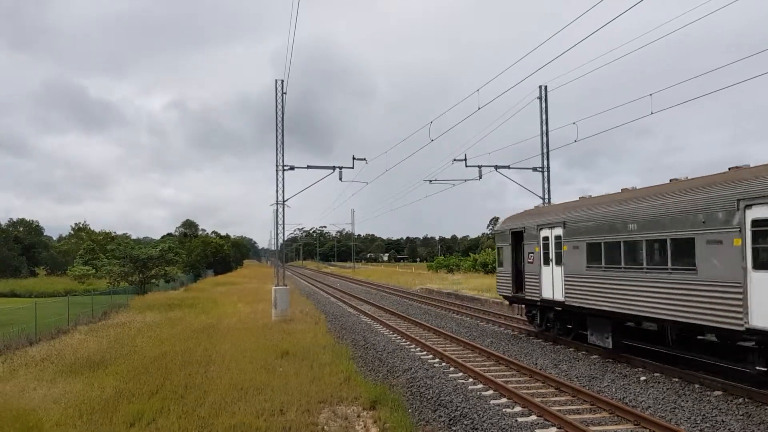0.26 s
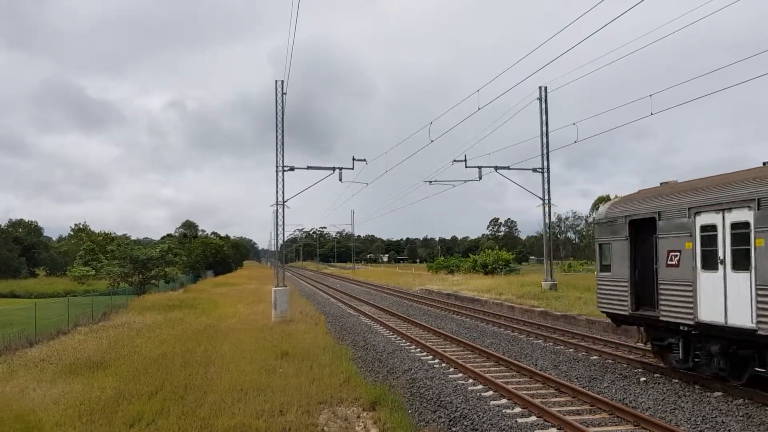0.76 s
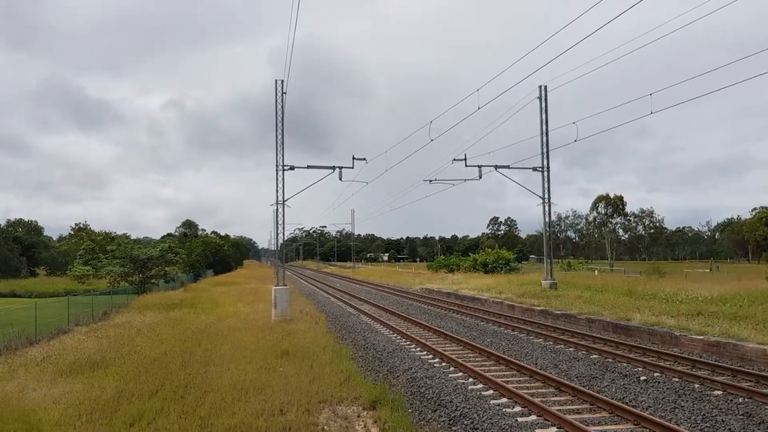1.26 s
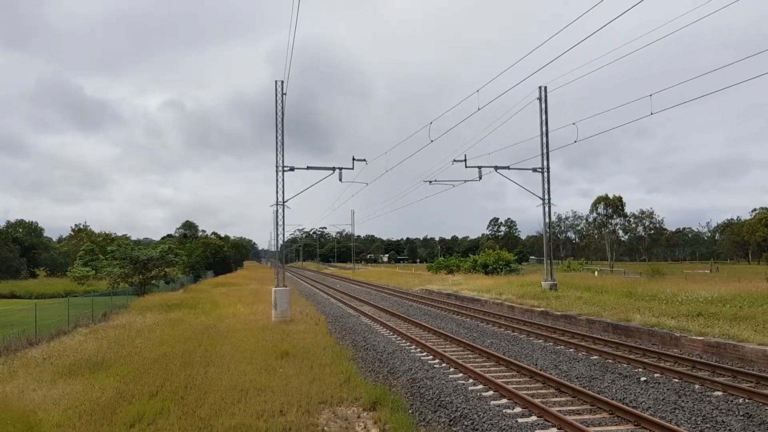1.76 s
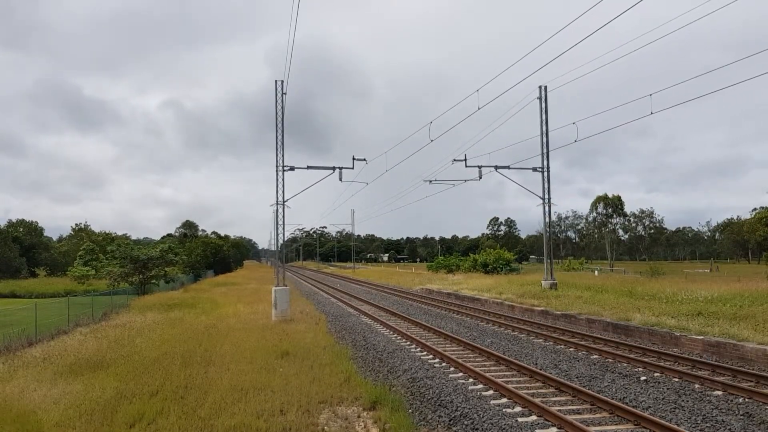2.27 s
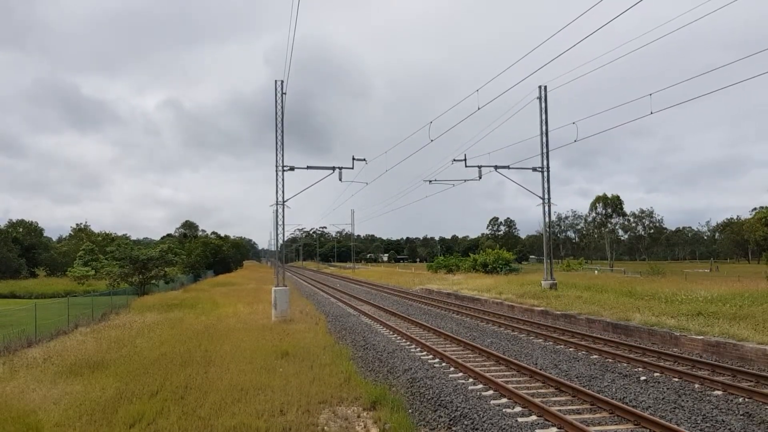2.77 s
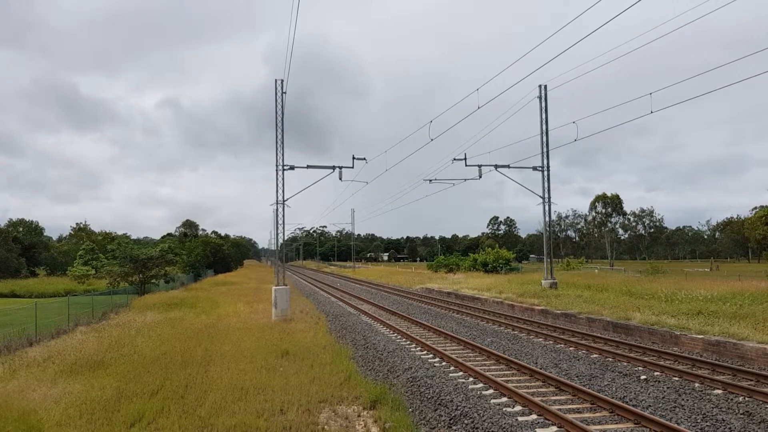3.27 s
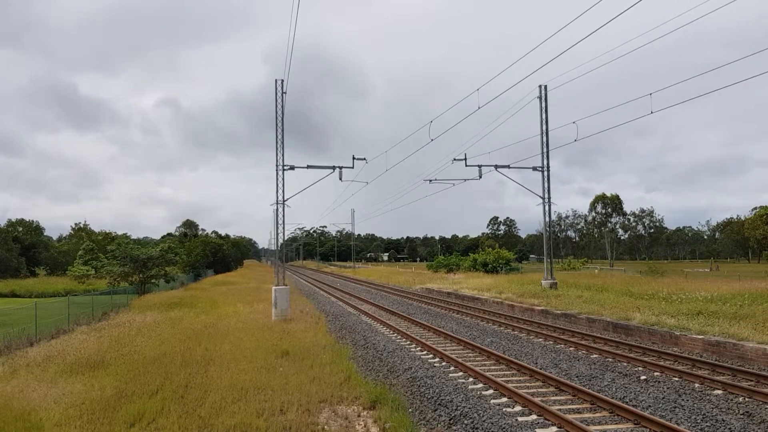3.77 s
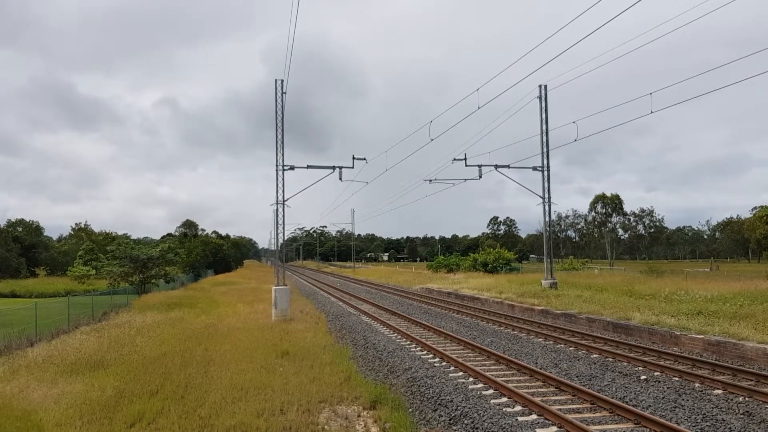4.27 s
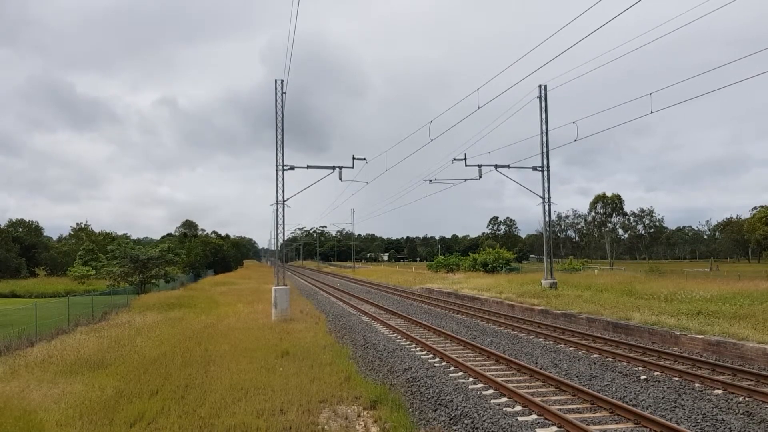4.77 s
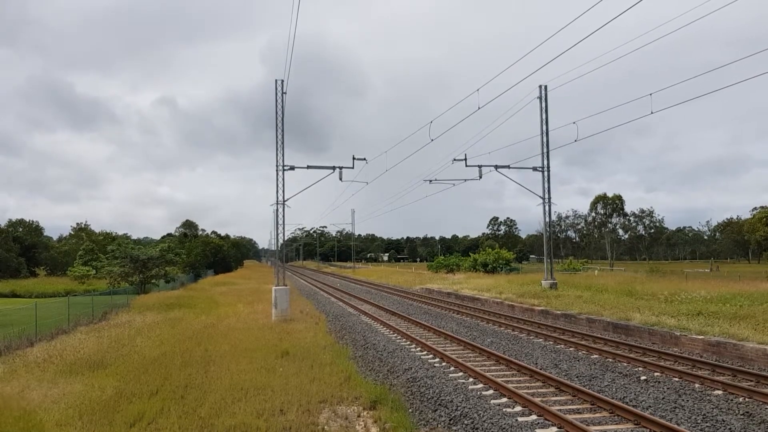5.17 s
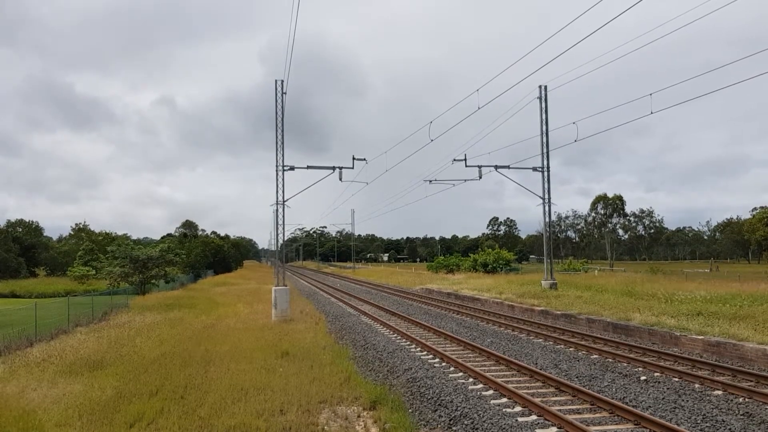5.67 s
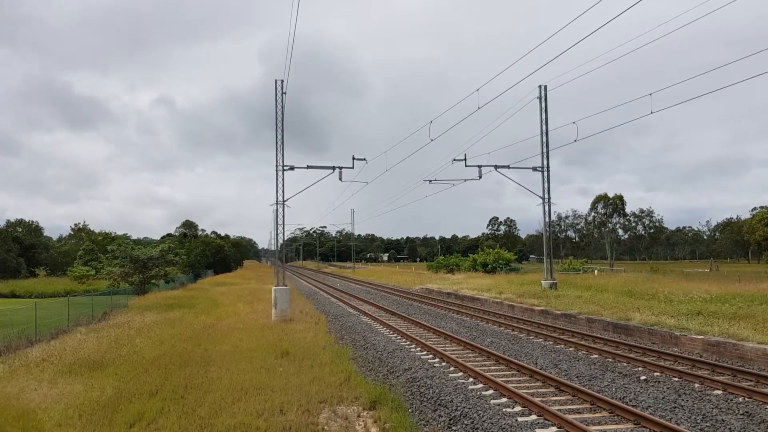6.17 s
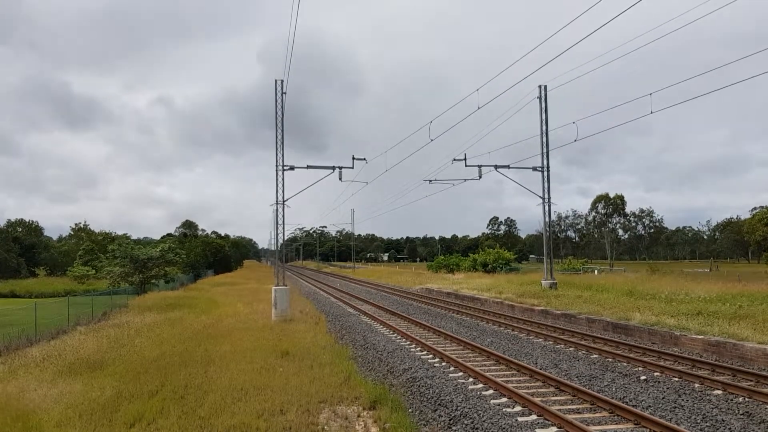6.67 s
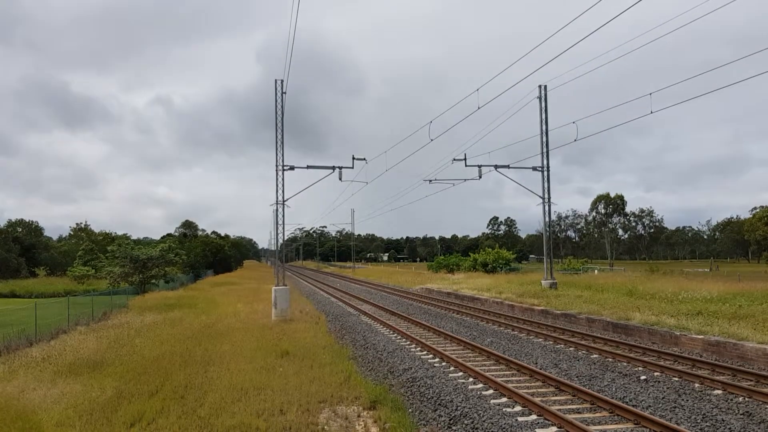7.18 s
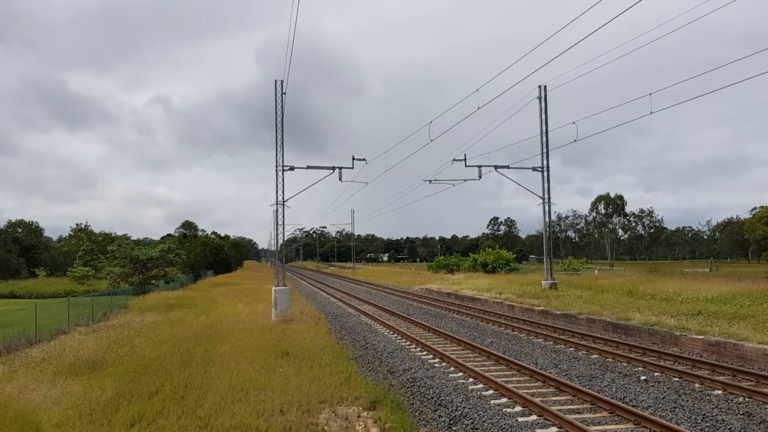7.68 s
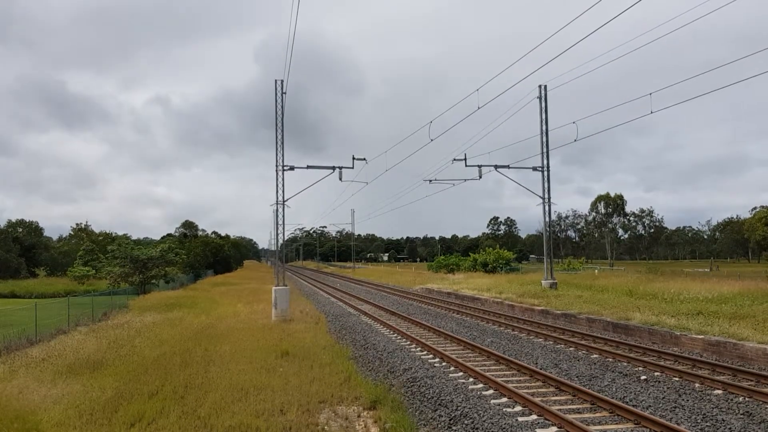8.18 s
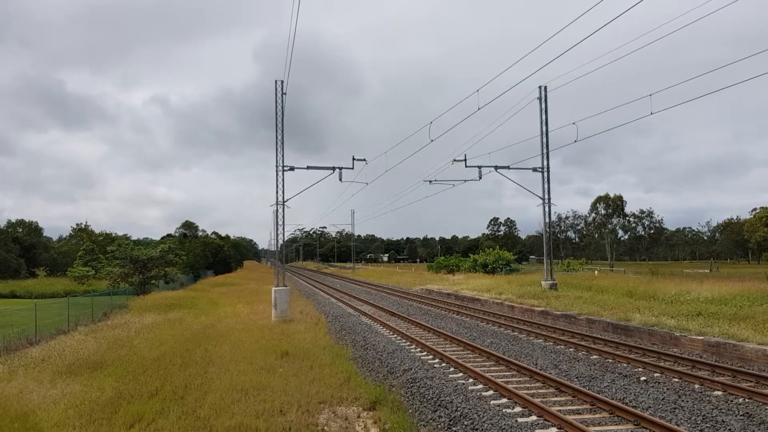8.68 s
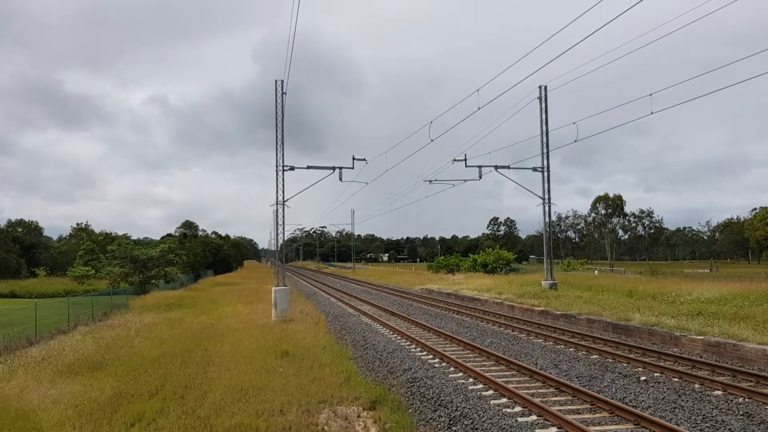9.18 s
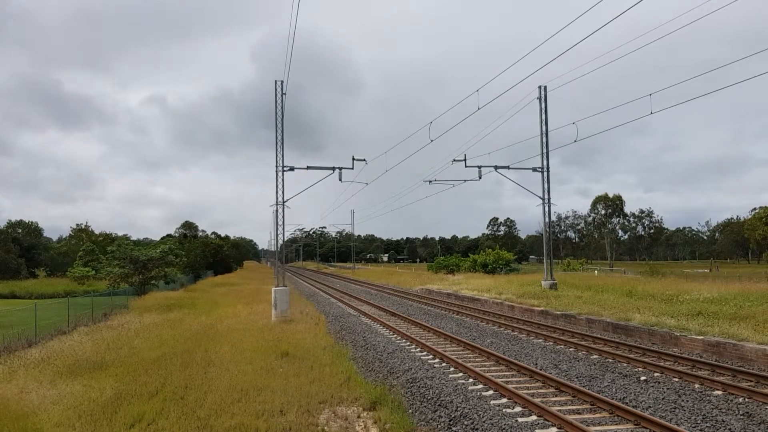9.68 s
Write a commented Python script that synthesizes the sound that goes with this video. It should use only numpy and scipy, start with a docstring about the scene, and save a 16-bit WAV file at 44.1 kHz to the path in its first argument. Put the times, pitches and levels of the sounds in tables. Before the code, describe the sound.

The last steel carriages of a train roll past close to the microphone, rumbling loudly with grinding, ringing wheels. Their wake buffets the microphone, then the rails sing on and wheel flanges squeak briefly as the train recedes along the open track. A light breeze thumps, a nearby camera shutter clicks in faint bursts, and the far locomotive gives one steam whistle blast.

```python
"""Beside a railway line, the last steel carriages of a steam train roll past close to the microphone.
Rough wheels shake the underframes and bodies, and the wake buffets the microphone. Then the rails
sing on and flanges squeak while the train rumbles away and a light breeze thumps. A still camera
nearby fires bursts of shutter clicks, and the far locomotive blows one blast of its steam whistle."""
import sys
import numpy as np
from scipy import signal
from scipy.fft import rfft, irfft, next_fast_len
from scipy.io import wavfile
from scipy.ndimage import uniform_filter1d, map_coordinates

SR = 44100
rng = np.random.default_rng(int(sys.argv[2]) if len(sys.argv) > 2 else 0)


def generate_wav(sig):
    """Save sig (samples, or channels by samples) to the path in sys.argv[1] as 16-bit PCM at SR."""
    pcm = np.round(np.clip(np.atleast_2d(sig).T, -1, 1) * 32767).astype(np.int16)
    wavfile.write(sys.argv[1], SR, pcm)


N = 437913
TIME = np.arange(N) / SR
SIZE = next_fast_len(N, True)
FREQ = np.maximum(np.arange(SIZE // 2 + 1) * SR / SIZE, 1)
SIDES = np.array([[.5], [-.5]])  # splits a left-minus-right level between the microphone's two ports

SURGE_S, RECEDE_S = 4.04, 5.52  # going away, the train surges, holds, then fades with distance
WHEEL_SWELL = dict(s=0.24, half_s=0.94)  # the nearest carriage goes by
LULL = dict(s=6.6, half_s=0.11)  # the sound from down the line dips briefly
LULL_DB = -4


def undb(db):
    """Decibels to gain."""
    return 10 ** (np.asarray(db) / 20)


def unit(x):
    """Scale to rms 1."""
    return x / np.sqrt(np.mean(x ** 2))


def colour(points):
    """An EQ curve through (Hz, dB) points."""
    hz, db = np.transpose(points)
    return undb(np.interp(np.log(FREQ), np.log(hz), db))


def resonances(modes):
    """An EQ curve of steep-skirted peaks, each (Hz, half width in Hz, dB)."""
    return sum(undb(db) / (1 + ((FREQ - hz) / width) ** 2) for hz, width, db in modes)


def filtered(x, gain):
    """Apply an EQ curve."""
    return irfft(rfft(x, SIZE) * gain, SIZE)[..., :N]


def bell(s, half_s, order=2):
    """A swell from 0 to 1 and back around s; a higher order has a flatter top."""
    return np.exp(-np.abs((TIME - s) / half_s) ** order)


def ramp(s, length_s):
    """A straight rise from 0 to 1 that starts at s."""
    return np.clip((TIME - s) / length_s, 0, 1)


def swells(rows):
    """Level in dB from a few swells."""
    return sum(db * bell(s, half_s) for s, half_s, db in rows)


def walk(rate):
    """A random wobble of rms 1 that glides to a new value rate times a second."""
    hold = max(int(SR / rate), 1)
    steps = np.repeat(rng.standard_normal(N // hold + 2), hold)
    return unit(uniform_filter1d(steps, hold)[hold // 2:hold // 2 + N])


def ports(drive, gain, lag_ms, diffuse_hz, shade=0, spread=0):
    """Noise of strength drive rings a body and reaches two ports: left late, treble from all sides."""
    # The housing shades the ports. Each row: frequency in Hz, left minus right in dB at shade 1.
    housing = [(150, -0.5), (1900, 2), (7500, 1.5), (9000, -6.5), (12000, -0.5), (15000, 0)]
    noise = rfft(rng.standard_normal((3, N)) * drive, SIZE)
    share = (1 - np.clip(spread, 0, 1)) / (1 + (FREQ / diffuse_hz) ** 2)
    late = np.exp(-2j * np.pi * FREQ * lag_ms / 1000)
    direct = np.array([noise[0] * late, noise[0]]) * np.sqrt(share)
    diffuse = noise[1:] * np.sqrt(1 - share)
    shading = colour(housing) ** (shade * SIDES)
    return unit(irfft((direct + diffuse) * gain * shading, SIZE)[:, :N])


def blows(times, sizes, rise_s, decay_s, hz=0):
    """Hits that swell and die away; with hz they also swing."""
    t = np.arange(SR // 4) / SR
    shape = (1 - np.exp(-t / rise_s)) * np.exp(-t / decay_s) * np.cos(2 * np.pi * hz * t)
    out = np.zeros(N + len(t))
    for s, size in zip(times, sizes):
        i = int(np.clip(s * SR, 0, N - 1))
        out[i:i + len(t)] += size * shape / np.abs(shape).max()
    return out[:N]


def jolts(rate, scatter_db, decay_s):
    """Wheels bump over the sleepers, loosely in step and never equally hard."""
    timing, force = rng.standard_normal((300, 2)).T
    times = (np.arange(len(timing)) + 0.321 * timing) / rate
    return unit(blows(times, undb(scatter_db * force), 0.0025, decay_s))


def ringing(events):
    """Each event brings out one resonance as an almost pure tone that swells and dies."""
    waver = 0.3 * walk(40)
    return sum(undb(db) * bell(s, half_s) * np.sin(2 * np.pi * hz * TIME + waver)
               for s, db, hz, half_s in events)


def passing(db, fade_s, db_per_s, knee_s=0.17):
    """Gain alongside the train, easing into a fast fade once the last carriage has gone."""
    return undb(db - db_per_s * knee_s * np.logaddexp(0, (TIME - fade_s) / knee_s))


def leaving(db, surge_db, db_per_s):
    """Level in dB going away: a surge up to db, a hold, then a steady fade with distance."""
    return db - surge_db * (1 - ramp(SURGE_S, 0.23)) - db_per_s * np.maximum(TIME - RECEDE_S, 0)


def hiss():
    """A bed of airy hiss that remains once the carriages have gone, drifting a little in level."""
    # The tone of the hiss. Each row: frequency in Hz, level in dB.
    air = [(2000, 2), (7000, -1), (8000, -7.5), (10000, 1.5), (15500, -5)]
    drift_db = 0.5 * walk(5) + 0.5 * walk(16)
    level_db = leaving(-57, surge_db=3.5, db_per_s=0.96) + drift_db + LULL_DB * bell(**LULL)
    return ports(1, colour(air), lag_ms=0.14, diffuse_hz=3000, shade=1) * undb(level_db)


def whistle(start_s=8.68, end_s=9.89, edge_s=0.047, warm_hz=435, flat_hz=15, warm_s=0.355):
    """A far steam whistle climbs in pitch and dulls as it warms; the air makes it waver."""
    # A stopped pipe favours odd partials. Each row: multiple of the pitch, relative level in dB.
    partials = [(2, -27), (3, -15.5), (4, -28)]
    age = np.maximum(TIME - start_s, 0)
    hz = warm_hz - flat_hz * np.exp(-age / warm_s)
    valve = ramp(start_s, edge_s) - ramp(end_s - edge_s, edge_s)
    phase = 2 * np.pi * np.cumsum(hz * (1 + 0.0019 * walk(30))) / SR
    overtones = sum(undb(db + 4 * walk(18)) * np.sin(k * phase) for k, db in partials)
    tone = np.sqrt(2) * (np.sin(phase) + undb(2 - 10 * age) * overtones)
    return tone * valve * undb(-37 - 3.5 * age + 0.95 * walk(19))


def ticks():
    """Tiny, dry ticks close to the microphone, with a bright top and a little body."""
    # The ticks. Each row: start in seconds, relative level in dB.
    cues = [(4.59, -43), (5.492, -44), (6.408, -45), (6.444, -43.5)]
    s, db = np.transpose(cues)
    crack = ports(1, resonances([(5000, 1200, 0), (12000, 3500, -2)]), lag_ms=0.037, diffuse_hz=7000)
    return crack * blows(s, undb(db + 0.5), rise_s=0.0005, decay_s=0.0035)


def shutter(frame_s=0.1636, lead_s=0.024, return_s=0.0337):
    """For each picture the mirror lifts, the shutter snaps, and the mirror drops as the motor winds."""
    # Presses of the button. Each row: first snap in seconds, number of pictures, relative level in dB.
    bursts = [(7.3587, 1, -40), (7.66, 5, -36.5), (9.299, 3, -38.5), (9.8136, 1, -36.5)]
    # The tone of the click. Each row: frequency in Hz, level in dB.
    click_eq = [(1500, 3), (3500, 1.5), (5000, 3), (6500, -13), (9500, -3.5), (12000, -7), (14500, -4),
                (16000, -17)]
    s, db = np.transpose([(first + k * frame_s, db) for first, count, db in bursts for k in range(count)])
    lift = blows(s - lead_s, undb(db - 7.5), rise_s=0.002, decay_s=0.005)
    snap = blows(s, undb(db), rise_s=0.0005, decay_s=0.0029)
    drop = blows(s + return_s, undb(db - 6.5), rise_s=0.001, decay_s=0.004)
    motor = blows(s + 0.012, undb(db - 13.5), rise_s=0.02, decay_s=0.02)
    click = ports(1, colour(click_eq), lag_ms=0.033, diffuse_hz=7200, shade=0.25)
    return click * (lift + snap + drop + motor) * undb(-5)


def knocks(left_db=-10):
    """Two short, dry knocks in the wake, mostly on the right."""
    # Knocks on the right port. Each row: start in seconds, level in dB.
    cues = [(2.848, -13), (3.307, -21)]
    s, db = np.transpose(cues)
    crack = unit(filtered(rng.standard_normal(N), resonances([(700, 600, 0)])))
    return crack * blows(s, undb(db), rise_s=0.00039, decay_s=0.0018) * undb([[left_db], [0]])


def gust(s, hold_s, db, pan_db, rise_db_per_s=132, fall_db_per_s=70):
    """One gust's level in dB at each port: quick attack, hold, slower release."""
    early, late = np.maximum(s - TIME, 0), np.maximum(TIME - s - hold_s, 0)
    return db - rise_db_per_s * early - fall_db_per_s * late + pan_db * SIDES


def wind():
    """The last carriage's wake strikes mostly the right port; later a light breeze thumps on both."""
    # Gusts. Each row: full strength at seconds, hold in seconds, strength in dB, left minus right in dB.
    gusts = [(2.778, 0.23, -22, -8), (3.1, 0.2, -29.5, -10), (4.65, 0.68, -34, 3.5),
             (6.016, 3.7, -35.5, -0.5), (9.233, 1.1, -33, 0.5)]
    # The hardest eddies. Each row: start in seconds, strength in dB, pitch in Hz, flutter decay in seconds.
    thuds = [(2.85, -9, 120, 0.0065), (2.926, -12, 114, 0.0087), (2.987, -8, 142, 0.0051),
             (3.271, -12.5, 165, 0.017), (7.242, -17.5, 222, 0.024), (7.353, -15, 173, 0.023),
             (7.424, -16, 308, 0.0059), (7.562, -15, 306, 0.028), (8.393, -15.5, 226, .013),
             (8.677, -18.5, 191, 0.0065), (8.93, -23, 300, .012), (9.256, -15, 215, 0.0069),
             (9.32, -16, 145, .007), (9.427, -20.5, 200, 0.034)]
    # The tone of ordinary eddies and of big, deep ones. Each row: frequency in Hz, level in dB.
    thump_eq = [(30, -26), (80, -5), (170, 3.5), (280, 2), (400, -5), (550, -17.5), (4000, -65)]
    deep_eq = [(20, -19), (55, 9.5), (100, 10), (200, -17), (2000, -78)]
    gust_db = np.max([gust(*row) for row in gusts], axis=0)
    turbulence = rng.standard_normal((2, N)) * undb(3.4 * walk(30))
    eddies = unit(filtered(turbulence, colour(thump_eq))) * undb(gust_db + 0.5)
    # only a hard gust brings big, deep eddies
    deep = unit(filtered(turbulence, colour(deep_eq))) * undb(1.67 * gust_db + 14.5)
    # a strong eddy is a sudden push of pressure that swings back, then flutters out
    push, tails = np.zeros((2, 2, N))
    for s, db, hz, flutter_s in thuds:
        pan_db = np.interp(s, TIME, gust_db[0] - gust_db[1])  # from the same side as its gust
        size = undb(db + pan_db * SIDES)
        push += size * blows([s], [1], rise_s=0.00094, decay_s=0.0047, hz=hz)
        tails += size * blows([s], [1], rise_s=0.0024, decay_s=flutter_s)
    flutter = ports(1, colour(thump_eq), lag_ms=0.03, diffuse_hz=2500, spread=0.8) * tails
    return eddies + deep + undb(-3) * push + undb(-10) * flutter


def squeaks(pan_db=3):
    """Brief rubs of a wheel flange make the rail ping."""
    # Flange rubs. Each row: loudest moment in seconds, level in dB, pitch in Hz, half length in seconds.
    rubs = [(4.435, -30, 2075, .025), (4.525, -30, 2085, 0.029), (4.715, -31, 2105, .022),
            (5.217, -23.5, 2130, 0.009), (5.415, -25.5, 2148, 0.011), (6.15, -25, 2148, 0.021),
            (7.6, -40, 2125, 0.041)]
    return ringing(rubs) * undb(pan_db * SIDES)


def singing_rails(level_db=-37, sag=0.013):
    """The rails' modes shimmer and flare at each bump; the low ones carry furthest."""
    # The rails' main modes, and weak upper ones that crowd into a sizzle.
    # Each row: pitch in Hz, half width in Hz, relative level in dB.
    modes = [(1153, 24, -2.5), (1277, 51, -9), (1492, 41, -2.5), (2097, 57, -3), (2145, 22, -6.5),
             (10500, 600, -28)]
    sizzle_modes = [(2890, 30, 7), (3360, 55, 2.5), (3790, 81, 2)]
    change_db = leaving(0, surge_db=6.7, db_per_s=3.14) + 7 * bell(**WHEEL_SWELL)
    sizzle = ports(undb(2 * walk(120)), resonances(sizzle_modes), lag_ms=0.45, diffuse_hz=4200)
    rails = sizzle * undb(level_db - 13 + 0.75 * change_db)
    for hz, width, db in modes:
        bump = jolts(rate=7.2, scatter_db=2, decay_s=0.04)
        drive = undb(2 * walk(45)) * (1 + 0.4 * bump)
        mode = ports(drive, resonances([(hz, width, 0)]), lag_ms=0.46, diffuse_hz=4900)
        height = min(hz / 2200, 1)
        rails += mode * undb(level_db + db + change_db * np.sqrt(height))
    # the ringing sinks in pitch as the train draws away
    position = np.cumsum(1 - sag * ramp(6.1, 1.6))
    sagging = np.array([map_coordinates(side, [position], order=3, mode="mirror") for side in rails])
    return sagging * undb(2 * SIDES)


def receding_train():
    """The rails carry the wheels' ringing back; rumble and rolling noise come through the air."""
    # The tone of the far rumble and of the far rolling. Each row: frequency in Hz, level in dB.
    rumble_eq = [(20, -24), (50, -26), (80, -1.5), (150, -3), (290, 2.5), (420, -1.5), (520, -13),
                 (900, -60)]
    roll_eq = [(350, -3), (560, 2), (860, 2.5), (1000, -3), (1280, -3), (1750, -10), (3000, -12),
               (6500, -27.5), (8000, -36.5)]
    bump = jolts(rate=7.2, scatter_db=3, decay_s=0.021)
    judder = 1 + 0.11 * bump
    crest_db = 2.9 * bell(4.9, 0.37)
    throb_db = 2 * walk(14) * ramp(RECEDE_S, 2.7)  # further away, the rumble comes more in beats
    rumble = ports(1 + 0.37 * bump, colour(rumble_eq), lag_ms=0.04, diffuse_hz=3000, spread=0.11)
    rumble *= undb(leaving(-28, surge_db=1.9, db_per_s=2.9) + crest_db + throb_db)
    roll = ports(judder, colour(roll_eq), lag_ms=0.12, diffuse_hz=2340, shade=0.71, spread=0.049)
    roll *= undb(leaving(-34, surge_db=2.9, db_per_s=2.56))
    # the broad ringing of the wheels fades sooner than that of the rails
    flicker = undb(1.4 * walk(28))
    wheels = ports(flicker, resonances([(2170, 244, 4)]), lag_ms=0.45, diffuse_hz=3300, shade=0.54)
    wheels *= undb(leaving(-39, surge_db=3.4, db_per_s=6.6))
    # the hollow drone of the carriage bodies is lost before the deeper rumble
    drone = ports(judder, resonances([(420, 41, -0.5), (620, 86, -12.5)]), lag_ms=0.054, diffuse_hz=3000)
    drone *= undb(leaving(-33, surge_db=6.2, db_per_s=8.5) + crest_db)
    return rumble + drone + (roll + singing_rails() + wheels) * undb(LULL_DB * bell(**LULL))


def carriages(lag_ms=0.39):
    """Rough wheels shake the underframes and steel bodies, and ring in their own modes."""
    # The tone of underframes, bodies, wheels and steel-on-steel hiss.
    # Each row: frequency in Hz, level in dB.
    underframe_eq = [(20, -52), (50, -5), (80, -1.5), (130, 9.5), (160, 0.5), (250, -61)]
    body_eq = [(90, -31), (150, -1.5), (300, 0), (430, -6), (550, -21), (950, -21), (3000, -54)]
    wheel_eq = [(300, -8), (450, 12.5), (750, 7.5), (950, 6), (1250, -2), (1700, 2.5), (2400, -2),
                (6300, -17), (7200, -25.5), (8000, -46), (15500, -55)]
    grit_eq = [(5000, -0.5), (8000, -7), (9300, -1), (12500, -2.5), (15500, -13)]
    # Resonances of the bodies and the wheels. Each row: pitch in Hz, half width in Hz, level in dB.
    body_modes = [(201, 16.4, 0.5), (275, 14.4, -5), (427, 25, -8)]
    wheel_modes = [(1515, 31, 5.5), (2142, 163, 2.5), (2900, 98, -9.5), (3400, 42, -11.5),
                   (3800, 135, -8.5), (4200, 86, -10.5), (4860, 110, -17)]
    # A rough wheel scours the rail; the wheels' hiss flares.
    # Each row: loudest moment in seconds, half length in seconds, boost in dB.
    scours = [(0.15, 0.012, 7), (0.355, 0.04, 5), (1.3, 0.093, 4)]
    flares = [(0.74, .13, 2.3), (1.34, 0.18, 2.5)]
    # A passing panel or underframe booms.
    # Each row: loudest moment in seconds, peak level in dB, pitch in Hz, half length in seconds.
    booms = [(0.47, -6, 125.6, .028), (0.84, -15.5, 197, 0.18), (1.06, -11.5, 263, 0.034)]
    wheel_swell, body_swell = bell(**WHEEL_SWELL), bell(0.37, 0.63, order=4)
    tail_swell = bell(2.35, 0.34)  # the tail of the train goes by
    bump = jolts(rate=15.7, scatter_db=3.5, decay_s=0.029)
    build_db = -15 * (1 - ramp(0, 0.27))  # the underframes build up late
    bass = ports(1, colour(underframe_eq), lag_ms, diffuse_hz=900)
    bass *= passing(-22 + 2.5 * tail_swell + build_db, fade_s=3, db_per_s=43)
    body_tone = colour(body_eq) + resonances(body_modes)
    body = ports(1 + 0.13 * bump, body_tone, lag_ms, diffuse_hz=4100, shade=0.74)
    body *= passing(-17.5 + 3.5 * body_swell, fade_s=3, db_per_s=78)
    grind = ports(1 + 0.32 * bump, colour(wheel_eq), lag_ms, diffuse_hz=2030, shade=1.8)
    grind *= passing(-24 + 8.5 * wheel_swell, fade_s=2.5, db_per_s=14.5)
    ring = ports(undb(1.45 * walk(21.87)), resonances(wheel_modes), lag_ms, diffuse_hz=3200, shade=1)
    ring *= passing(-28 + 4.5 * wheel_swell, fade_s=3, db_per_s=39)
    grit = ports(1, colour(grit_eq), lag_ms, diffuse_hz=2400, shade=1.8)
    grit *= passing(-46 + 6 * wheel_swell + swells(flares), fade_s=2.5, db_per_s=17)
    scour = undb(swells(scours))
    wheels = (scour * ring + scour ** 0.22 * grind) * undb(1.1 * tail_swell)
    return bass + ringing(booms) + body + wheels + grit


def scene():
    """The stereo mix beside the open track."""
    train = carriages() + receding_train() + squeaks()
    return train + wind() + hiss() + shutter() + ticks() + whistle() + knocks()


def record(dry):
    """The recorder clips at full scale and cuts the top above 15.7 kHz."""
    high_cut = signal.ellip(10, 0.2, 80, 15700, fs=SR, output="sos")
    return signal.sosfilt(high_cut, np.clip(dry, -1, 1))


dry = scene()
out = record(dry)
generate_wav(out)
```